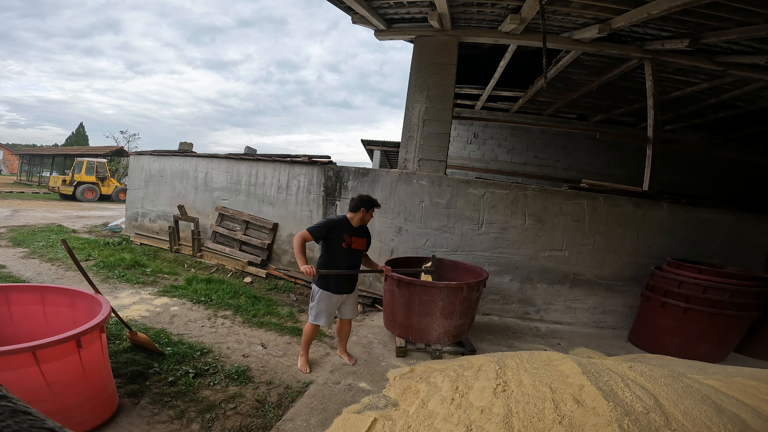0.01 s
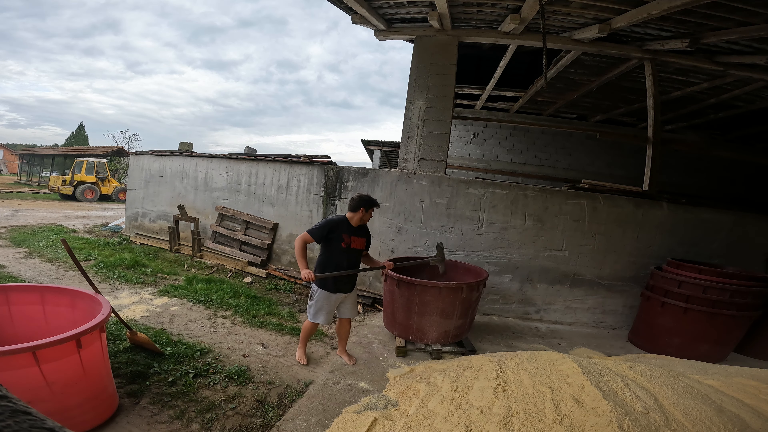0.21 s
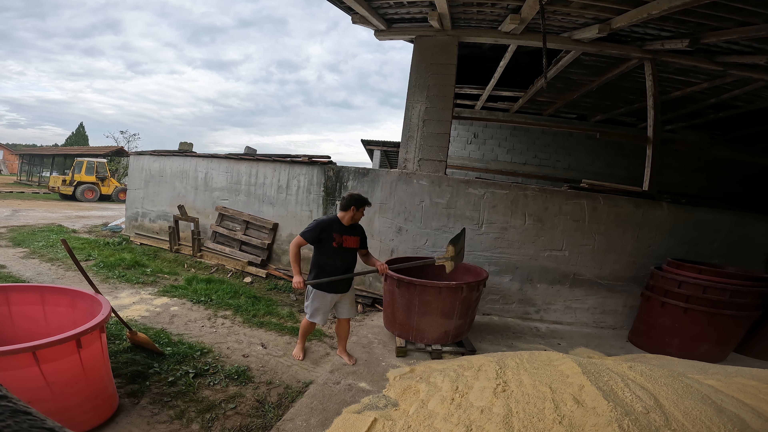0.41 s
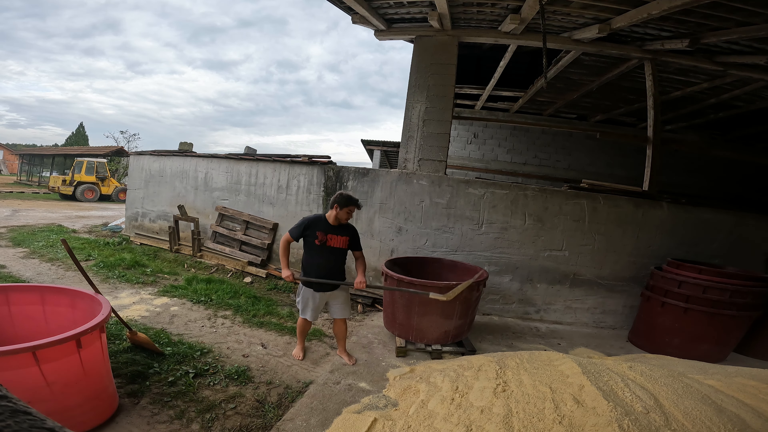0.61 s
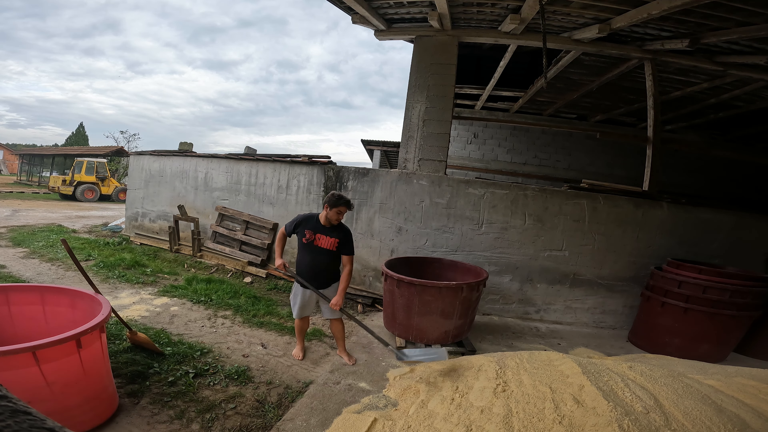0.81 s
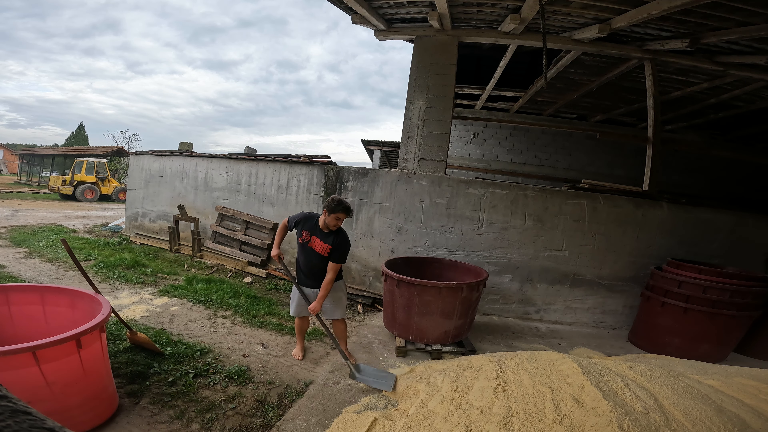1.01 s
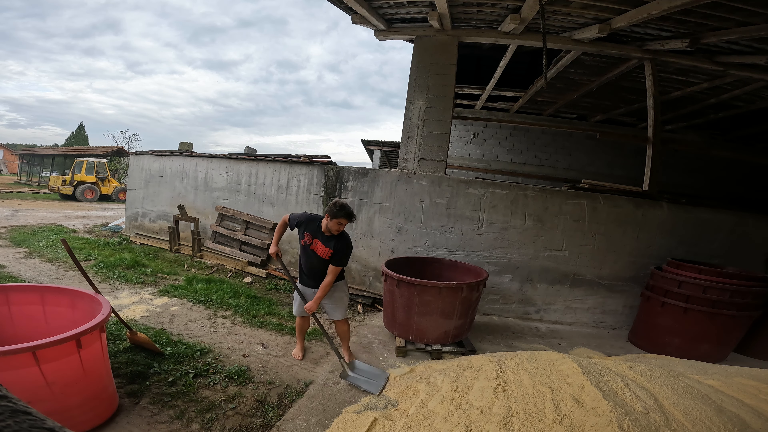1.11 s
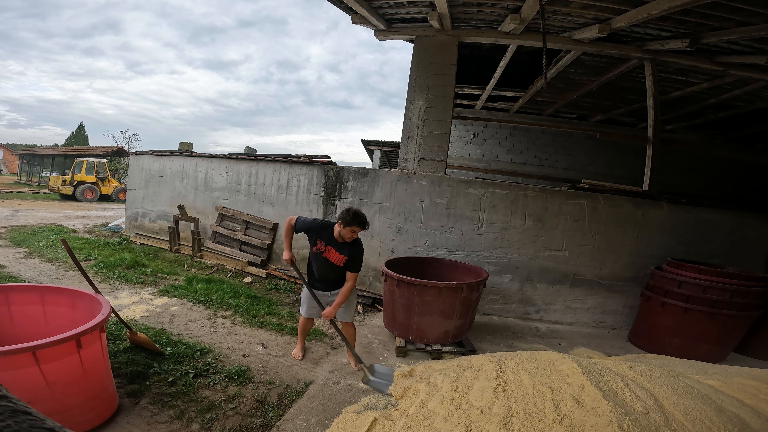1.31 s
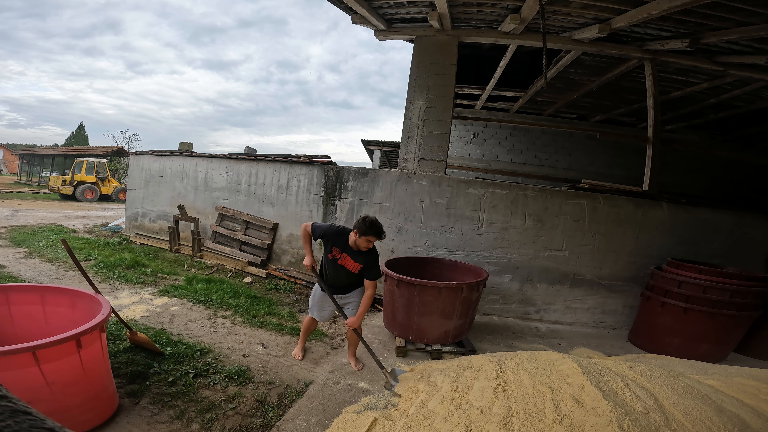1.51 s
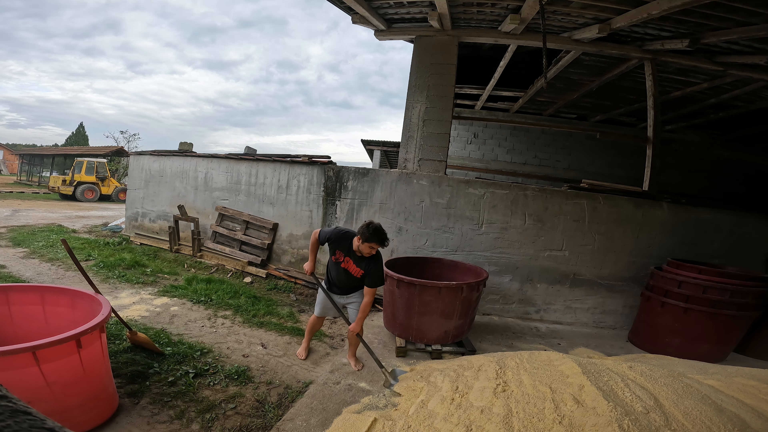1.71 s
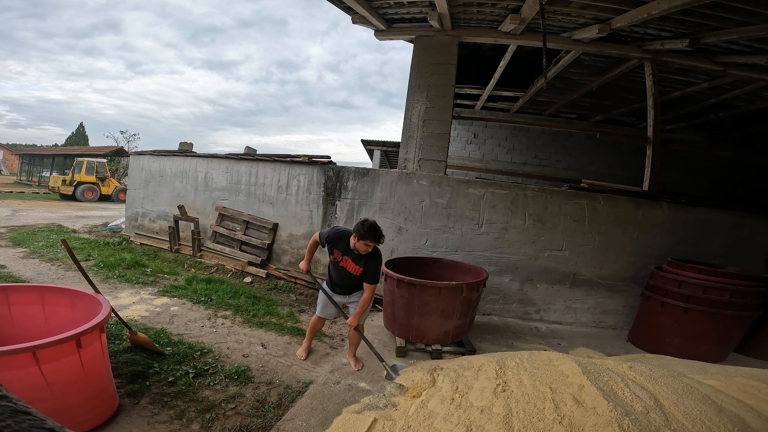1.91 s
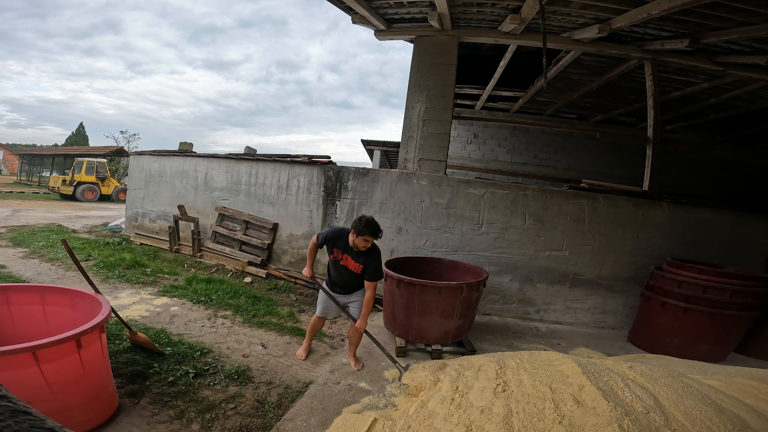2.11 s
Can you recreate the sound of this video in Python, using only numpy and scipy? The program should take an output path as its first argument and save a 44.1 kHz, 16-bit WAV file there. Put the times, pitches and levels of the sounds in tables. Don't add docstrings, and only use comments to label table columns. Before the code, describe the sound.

A shovel scrape on concrete is the main sound. Grain sifts faintly at first, then at 0.22 s a shovelful drops into a large plastic tub with a deep hollow thud and short spray, settling by 0.5 s. Quiet hum follows. At 1.29 s the steel blade bites the floor, chattering and ringing, dulling until about 1.6 s. Light rustles and trickling grain end it near 2.2 s.

```python
import sys
import numpy as np
from scipy import signal
from scipy.fft import rfft, irfft
from scipy.io import wavfile
from scipy.ndimage import uniform_filter1d

SR = 44100
rng = np.random.default_rng(int(sys.argv[2]) if len(sys.argv) > 2 else 0)


def convert_level_to_amplitude(level_db):
    exponent = np.asarray(level_db, float) / 20
    return 10 ** exponent


def generate_wav(sig):
    pcm = np.round(np.clip(np.atleast_2d(sig).T, -1, 1) * 32767).astype(np.int16)
    wavfile.write(sys.argv[1], SR, pcm)


N = 97020
T = np.arange(N) / SR


def evened(x):
    return x / np.sqrt(np.mean(x ** 2) + 1e-20)


def read(points, hz):
    f, value = np.transpose(points)
    return np.interp(np.log(hz + 1), np.log(f + 1), value)


def level(points, column=1):
    rows = np.transpose(points)
    return np.interp(T, rows[0], rows[column])


def colour(x, points, as_db=True):
    gain = read(points, np.fft.rfftfreq(x.shape[-1], 1 / SR))
    if as_db:
        gain = convert_level_to_amplitude(gain)
    return irfft(rfft(x) * gain, x.shape[-1])


def highpass(x, hz):
    return signal.lfilter(*signal.butter(2, hz, "high", fs=SR), x)


def resonate(x, hz, width_hz):
    r = np.exp(-np.pi * width_hz / SR)
    return signal.lfilter([1 - r, 0, r - 1], [1, -2 * r * np.cos(2 * np.pi * hz / SR), r * r], x)


def resonate_twice(x, hz, width_hz):
    return resonate(resonate(x, hz, width_hz), hz, width_hz)


def grains(per_s, spread_db):
    size = convert_level_to_amplitude(spread_db * np.minimum(rng.exponential(1, N), 4)) * rng.standard_normal(N)
    return evened(size * (rng.random(N) < per_s / SR))


def burst(start_s, rise_s, t60_s):
    age_s = np.maximum(T - start_s, 0)
    decay = convert_level_to_amplitude(-60 * np.maximum(age_s - rise_s, 0) / t60_s)
    return np.minimum(age_s / rise_s, 1) * decay


def knocks(rows):
    total = np.zeros(N)
    for start_s, level_db, swell_ms, pitch_hz in rows:
        u = np.maximum(T - start_s, 0) * 1000 / swell_ms
        total += convert_level_to_amplitude(level_db) * u * np.exp(1 - u) * np.sin(2 * np.pi * pitch_hz * (T - start_s))
    return total


def hum():
    # freq_hz, level_db_per_hz
    wash_spectrum = [(15, -37), (25, -5.5), (147, -2.5), (232, -14.5), (258, -16), (643, -47.5), (735, -39),
                     (2040, -50), (15200, -82)]
    # freq_hz, width_hz, level_db
    motor_lines = [(76.6, 1.3, -1.5), (170.5, 5.5, -2), (343.5, 14, -13)]
    wash_db, lines_db = -50.5, -63
    noise = rng.standard_normal((3, N))
    wash = colour(noise[:2], wash_spectrum)
    swell_db = 0.3 * evened(uniform_filter1d(rng.standard_normal(N), size=3000))
    lines = sum(convert_level_to_amplitude(db) * evened(resonate(noise[2], hz, width_hz)) for hz, width_hz, db in motor_lines)
    wash = convert_level_to_amplitude(wash_db) * convert_level_to_amplitude(swell_db) * wash / wash.std()
    return wash + convert_level_to_amplitude(lines_db) * lines * np.array([[1], [0]])


def shed(x):
    # freq_hz, t60_s
    wall_decay = [(60, 0.82), (150, 0.119), (300, 0.22), (700, 0.33), (1500, 0.29), (4000, 0.3),
                  (10000, 0.25)]
    yard_db, yard_t60_s, yard_tilt_db_per_khz = -29, 1.66, 3
    taps = np.zeros((2, SR))
    at = np.arange(200, SR - 20, 20) + rng.integers(0, 20, (2, (SR - 201) // 20))
    np.put_along_axis(taps, at, rng.choice([-1., 1.], at.shape), 1)
    hz, t, z = signal.stft(taps, SR, nperseg=256)
    hz = hz[:, None]
    walls = convert_level_to_amplitude(-60 * t / read(wall_decay, hz))
    yard = convert_level_to_amplitude(yard_db - 60 * t / yard_t60_s - yard_tilt_db_per_khz * hz / 1000)
    tail = signal.istft(z * (walls + yard), SR, nperseg=256)[1]
    return signal.fftconvolve(x[None], tail / np.linalg.norm(tail[0]), axes=1)[:, :N]


def trickle():
    # start_s, sift_db, weight_db
    slide = [(.04, -57.5, -50), (.14, -58, -50.5), (.205, -63.5, -56), (.45, -65.5, -50), (.56, -71.5, -69),
             (.62, -66.5, -90), (.7, -69.5, -82), (.8, -83, -83), (.95, -98, -67), (1.6, -73, -78),
             (1.72, -63, -61), (1.86, -71, -64), (1.92, -74, -62.5), (2.03, -73, -70), (2.065, -60, -56),
             (2.13, -59, -46), (2.17, -62, -48), (2.2, -94, -64)]
    # freq_hz, level_db_per_hz
    sift_spectrum = [(240, -45), (400, -6), (661, -11.5), (953, -1.5), (1250, 0.5), (1460, 0), (5930, -4.5),
                     (12700, -25.5), (15200, -36)]
    # start_s, level_db, rise_s, t60_s, centre_hz, width_share
    touches = [(1.161, -57, .003, .16, 7200, .6), (1.163, -64, .004, .35, 4200, .9),
               (1.163, -60, .04, .3, 1700, 1.1), (1.264, -60, .004, .12, 1700, 1),
               (1.272, -49, .013, .1, 1500, .8), (1.2, -66, .02, .2, 550, .6),
               (.66, -68, .06, .7, 1300, .4), (.6, -69, .06, 1.1, 2500, .4), (1.91, -66, .01, .3, 640, .25),
               (2.05, -64, .08, .25, 6300, .55), (2.122, -65, .008, .06, 5000, .5),
               (1.776, -56, .004, .1, 800, .9), (1.83, -60, .004, .12, 1300, .6),
               (1.695, -56, .004, .1, 700, 1), (1.725, -58, .004, .1, 800, 1),
               (1.99, -50, .025, .15, 100, .7), (1.48, -38, .05, .25, 100, .5),
               (1.8, -62, .01, .4, 570, .3)]
    already_sliding = np.minimum(0.37 + T / 0.058, 1)
    sift = evened(colour(grains(9000, -1), sift_spectrum)) * convert_level_to_amplitude(level(slide) + 3) * already_sliding
    weight = evened(resonate_twice(rng.standard_normal(N), 120, 147)) * convert_level_to_amplitude(level(slide, column=2))
    loose = sift + weight
    for start_s, db, rise_s, t60_s, hz, width_share in touches:
        rub = evened(resonate_twice(rng.standard_normal(N), hz, width_share * hz))
        loose = loose + convert_level_to_amplitude(db) * burst(start_s, rise_s, t60_s) * rub
    return loose


def thud():
    # start_s, level_db, swell_ms, pitch_hz
    clumps = [(.224, -23, 16.4, 299), (.238, -18.5, 42, 59), (.33, -25, 18, 60.3), (.232, -22, 7.3, 223),
              (.238, -22, 16, 111), (.243, -34, 6.7, 397), (.232, -32, 7.4, 562), (.25, -15, 10, 132),
              (.254, -18, 7.2, 256), (.252, -37.5, 5.7, 591), (.26, -27, 8, 384), (.264, -15.5, 9, 214),
              (.275, -14, 7.5, 177), (.29, -23, 8.6, 112), (.285, -33.5, 11.5, 552),
              (.285, -30.5, 7.1, 361), (.302, -21.5, 5.8, 295), (.308, -17, 7.3, 107),
              (.318, -30.5, 8, 241), (.338, -22.5, 8.8, 181.5), (.342, -32.5, 9.8, 352),
              (.362, -20.5, 7.5, 101), (.37, -33.5, 11, 217), (.375, -42.5, 8.4, 392),
              (.405, -41, 9.6, 328), (.43, -41.5, 13, 201.7), (.4, -31, 7.3, 111), (.422, -34, 7.2, 90),
              (.445, -31.5, 7.7, 92), (.5, -41.5, 16.5, 119)]
    # time_s, level_db
    fall_curve = [
        (.212, -73),
        (.224, -42.5),
        (.232, -33),
        (.255, -33.5),
        (.31, -45.5),
        (.34, -42.5),
        (.356, -35.5),
        (.39, -53),
        (.5, -83),
    ]
    # freq_hz, level_db_per_hz
    spray_spectrum = [(180, -29), (300, -6.5), (403, -14.5), (483, -21), (551, -20), (694, -21.5),
                      (5780, -38), (12300, -52.5), (15200, -62)]
    # freq_hz, level_db
    rumble_spectrum = [(26, -29), (45, 3), (120, 5), (270, -14.5), (481, -27), (545, -18.5), (900, -37),
                       (1170, -72), (1980, -120)]
    fall = convert_level_to_amplitude(level([(0, -120)] + list(fall_curve) + [(.7, -100), (2.2, -120)]))
    spray = colour(grains(9000, 0.95), spray_spectrum)
    spray = spray / np.std(resonate(spray, 3070, 6900)) * 0.49
    rumble = evened(colour(rng.standard_normal(N), rumble_spectrum))
    return knocks(clumps) + fall * (spray + convert_level_to_amplitude(8) * rumble)


def blade_ring(x):
    # freq_hz, width_hz, level_db
    modes = [(883, 30, -1), (921, 25, 0), (1068, 45, -5), (1120, 40, -4), (1207, 40, -4), (1300, 40, -4),
             (1438, 45, -4), (1571, 30, -3), (2023, 40, -9), (2304, 30, -4), (2487, 40, -8),
             (3040, 80, -12), (3780, 60, -15), (5210, 110, -18)]
    return sum((-1) ** k * convert_level_to_amplitude(db) * resonate(x, hz, width_hz) for k, (hz, width_hz, db) in enumerate(modes))


def handle_shake(x):
    # freq_hz, width_hz, level_db
    modes = [(120, 55, 0), (220, 42, 6.5), (347.7, 24.7, -1), (478, 20, -10), (516, 46, -2), (620, 122, -4),
             (670, 28, -25), (846, 14, -20.5)]
    return sum(convert_level_to_amplitude(db) * resonate(resonate(x, hz, width_hz), hz, 4 * width_hz) for hz, width_hz, db in modes)


def scrape():
    # time_s, pressure_db, filled_share
    stroke = [
        (1.2855, -56, .05),
        (1.2872, -26, .08),
        (1.33, -28, .25),
        (1.41, -29, .45),
        (1.5, -26, .8),
        (1.55, -35, .95),
        (1.6, -47, .95),
        (1.68, -64, .95),
    ]
    # start_s, level_db, brightness_db, patch_hz
    catches = [(1.2861, -9.5, -12.5, 1300), (1.313, -6.5, -16, 1150), (1.325, -6, -21.5, 1150),
               (1.362, -1, -25, 810), (1.383, -8.5, -27, 895), (1.394, -5, -21, 1300),
               (1.421, 0.5, -18, 1377), (1.444, -4.5, -20, 2010), (1.472, -7, -8.5, 1390),
               (1.484, -11.5, -28.5, 1300), (1.5, -8, -21, 820)]
    # freq_hz, level_db_per_hz
    grit_spectrum = [(180, -20), (300, -19), (342, -6), (671, -10), (902, -3), (2340, -9.5), (7640, -26.5),
                     (11000, -43), (15200, -53)]
    # start_s, level_db, swell_ms, pitch_hz
    jumps = [(1.2865, -16.5, 0.98, 1290), (1.289, -25.5, 5, 1001), (1.3, -22, 6.5, 1113),
             (1.32, -25, 6.5, 974), (1.358, -20, 6.7, 898), (1.381, -22, 4.8, 898), (1.384, -23, 5.7, 1192),
             (1.422, -22.5, 6, 1447), (1.425, -25.5, 8.6, 922), (1.436, -27.5, 7, 440),
             (1.45, -24, 7.2, 1215), (1.463, -26.5, 4.4, 944), (1.467, -24.5, 7.9, 349.4),
             (1.288, -24, 5.2, 1616), (1.322, -25.5, 5.4, 2470), (1.33, -27, 9, 1737),
             (1.31, -28.5, 11, 1307), (1.338, -24, 6.4, 2286), (1.35, -19.5, 7.3, 1498),
             (1.36, -26, 6.7, 2440), (1.366, -26.5, 10, 1584), (1.398, -27.5, 5.9, 2513),
             (1.398, -23.5, 9.6, 1410), (1.42, -21, 4.4, 2311), (1.443, -25, 3.1, 2296),
             (1.471, -26.5, 4.6, 1648), (1.5, -30.5, 4.6, 2090), (1.506, -30.5, 7.6, 830),
             (1.516, -26.5, 3, 594), (1.524, -31, 11, 226.7), (1.565, -32.5, 5.8, 587)]
    dull_hz, bright_hz = 1520, 2820
    catch_rise_s, catch_t60_s = .002, .075
    ring_db, patch_db, handle_db = -12.5, -12, 2.5
    narrow_s, first_top_hz, later_top_hz = 1.345, 14800, 13100

    pressure = convert_level_to_amplitude(level([(1.27, -100, 0)] + list(stroke) + [(1.8, -110, 0)]))
    full = np.clip(level(stroke, column=2), 0, 1)
    grit = grains(12000, 3.5)
    high = highpass(grains(9000, 0.97), bright_hz)

    drive = pressure * grit
    bright, patches = np.zeros((2, N))
    for start_s, db, bright_db, hz in catches:
        hit = burst(start_s, catch_rise_s, catch_t60_s) * convert_level_to_amplitude(db - 9.5)
        patch = resonate(resonate(hit * grit, hz, 0.48 * hz), hz, hz)
        patches = patches + patch * np.sqrt(SR / hz)
        drive = drive + .5 * hit * grit
        bright = bright + hit * convert_level_to_amplitude(bright_db + 17) * high

    dull = signal.lfilter(*signal.butter(1, dull_hz, fs=SR), drive)
    drive = full * dull + (1 - full) * drive + bright
    rasp = colour(drive, grit_spectrum) / np.std(colour(grit, grit_spectrum))
    ring = (1 - full) * blade_ring(drive) / np.std(blade_ring(grit))
    blade = rasp + convert_level_to_amplitude(ring_db) * ring
    shake = evened(handle_shake(grit)) * pressure * full
    tool = 0.75 * blade + convert_level_to_amplitude(patch_db) * patches + convert_level_to_amplitude(handle_db) * shake + knocks(jumps)

    def lowpass(hz):
        return signal.sosfiltfilt(signal.butter(20, hz, fs=SR, output="sos"), tool)

    return np.where(T < narrow_s, lowpass(first_top_hz), lowpass(later_top_hz))


def scene():
    # freq_hz, gain
    apart = [(60, 0.044), (200, 0.15), (700, 0.58), (3000, 0.92), (9000, 0.59), (13000, 1)]
    shed_db, dry_bass_hz = -5, 300
    duck_db, duck_s = -5.5, 0.41
    tub, tool, loose = thud(), scrape(), trickle()
    direct = tub + tool + loose
    wet = convert_level_to_amplitude(shed_db) * shed(highpass(direct, dry_bass_hz))
    farm = hum() * convert_level_to_amplitude(duck_db * np.exp(-((T - 1.7) / duck_s) ** 2))
    mid = direct + wet[0] + farm[0]
    side = colour(convert_level_to_amplitude(-3.0) * wet[1] + farm[1], apart, as_db=False)
    side = side - 0.064 * tool - 0.026 * tub
    return np.array([mid + side, mid - side])


def band_limit(x):
    return signal.sosfilt(signal.butter(12, 15390, fs=SR, output="sos"), x)


def record(dry):
    return band_limit(dry)


dry = scene()
out = record(dry)
generate_wav(out)
```